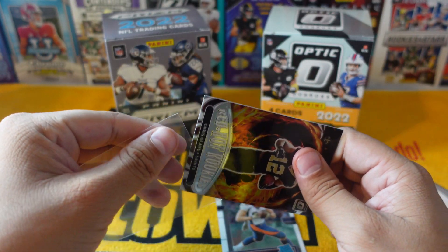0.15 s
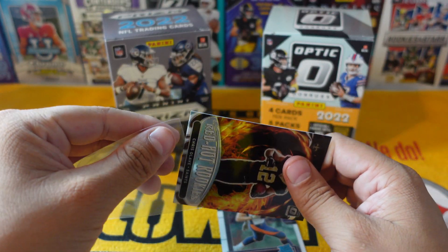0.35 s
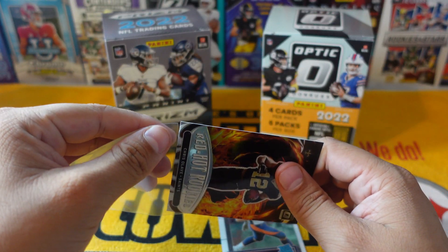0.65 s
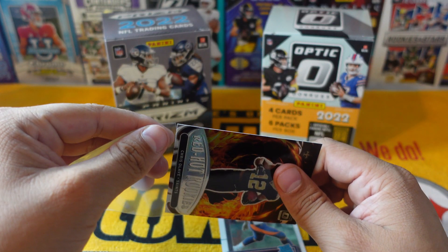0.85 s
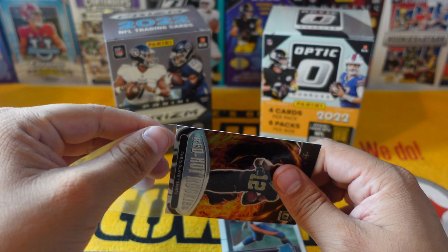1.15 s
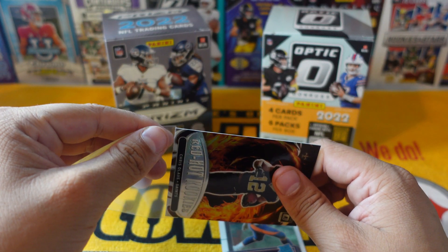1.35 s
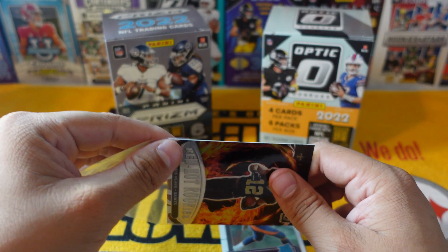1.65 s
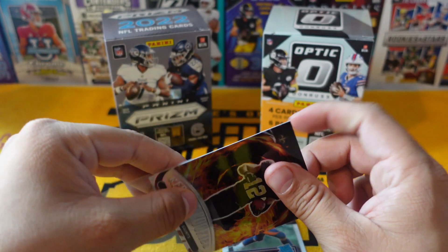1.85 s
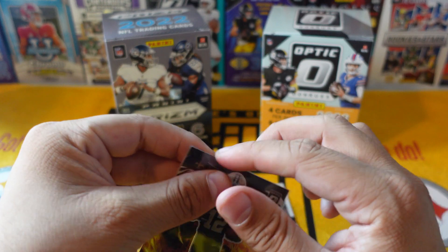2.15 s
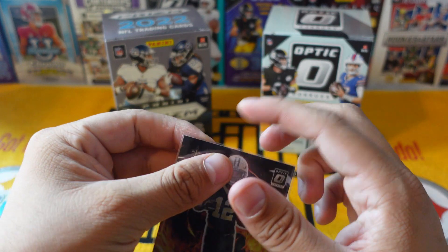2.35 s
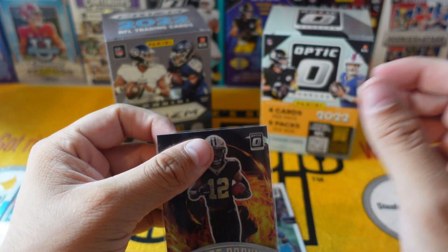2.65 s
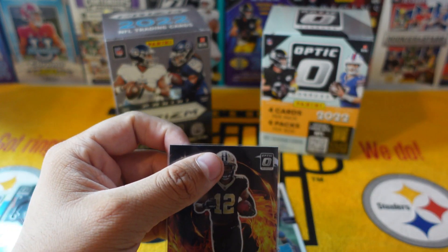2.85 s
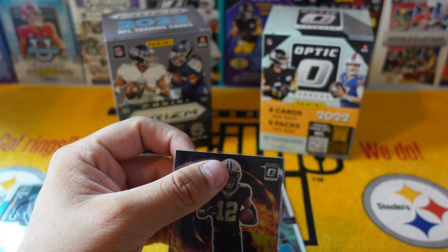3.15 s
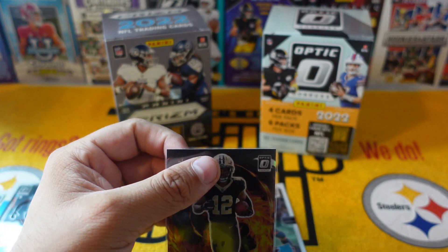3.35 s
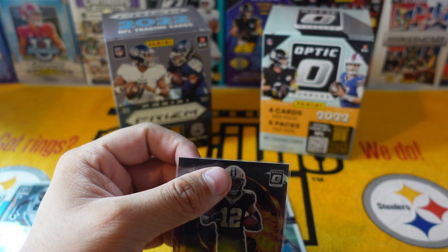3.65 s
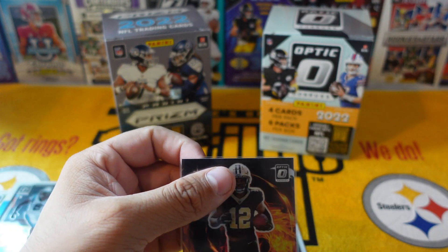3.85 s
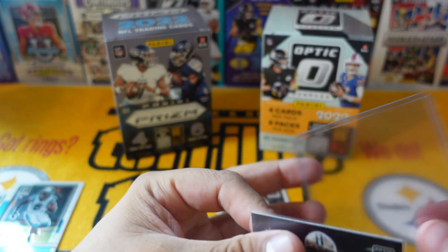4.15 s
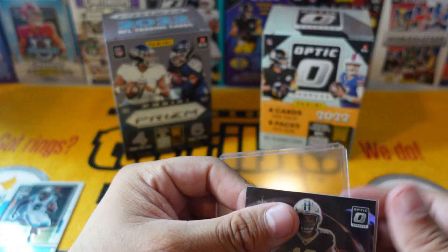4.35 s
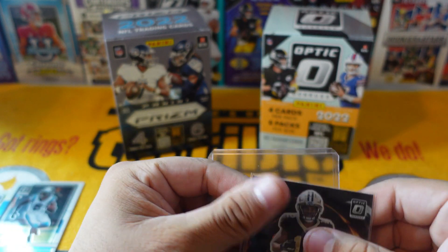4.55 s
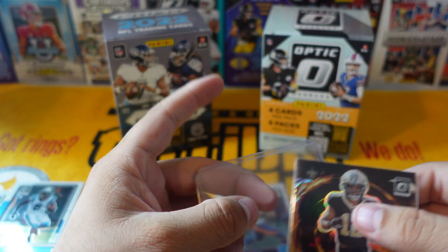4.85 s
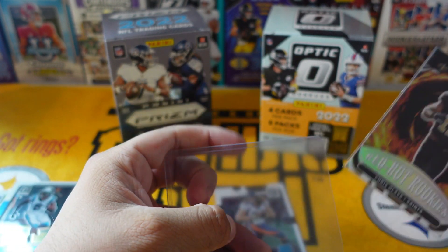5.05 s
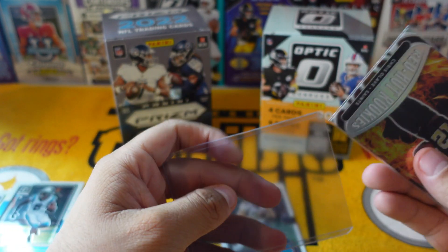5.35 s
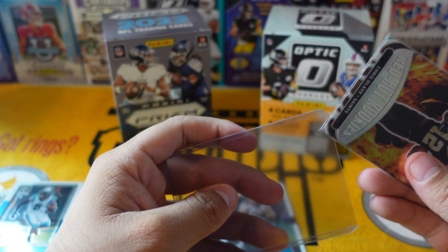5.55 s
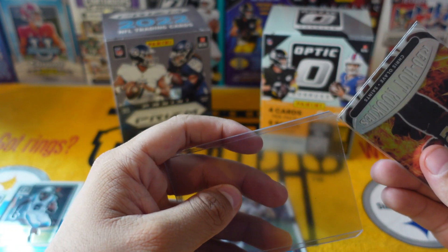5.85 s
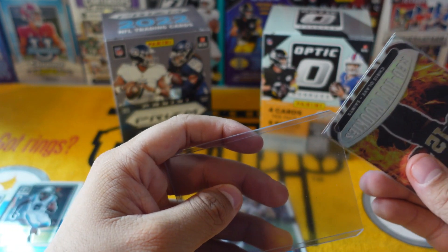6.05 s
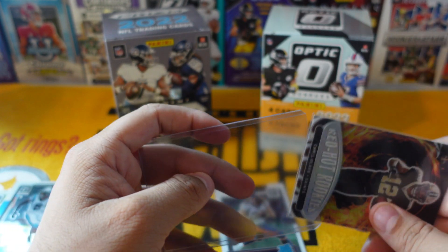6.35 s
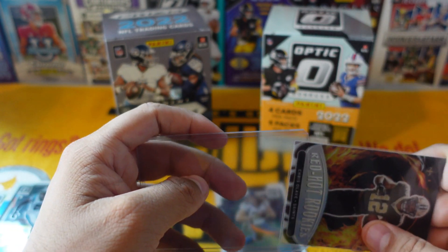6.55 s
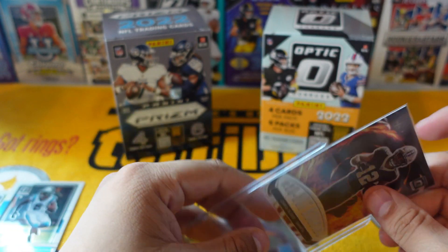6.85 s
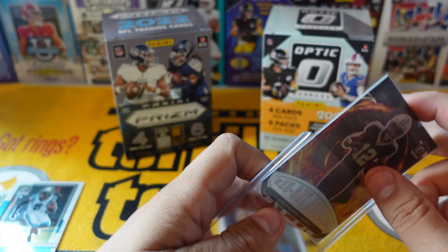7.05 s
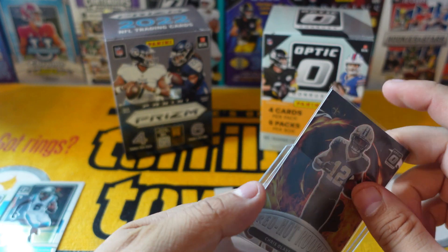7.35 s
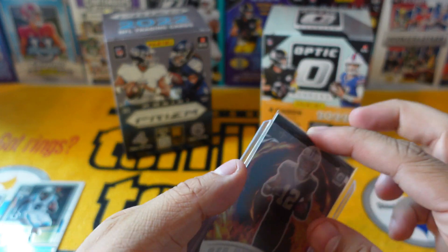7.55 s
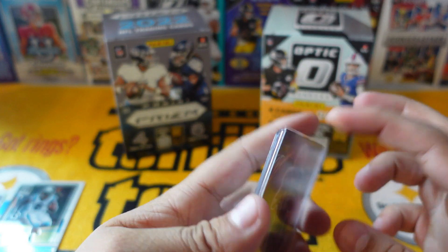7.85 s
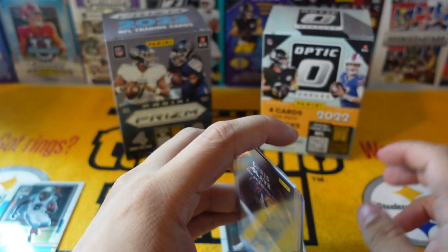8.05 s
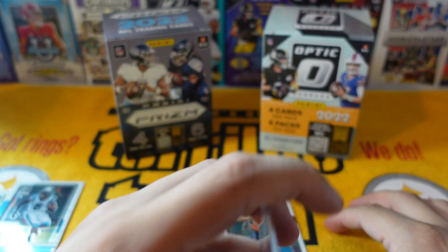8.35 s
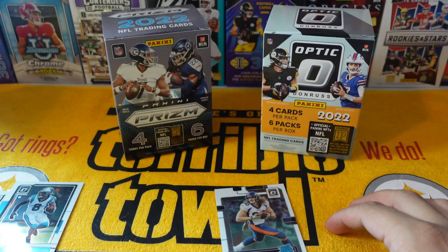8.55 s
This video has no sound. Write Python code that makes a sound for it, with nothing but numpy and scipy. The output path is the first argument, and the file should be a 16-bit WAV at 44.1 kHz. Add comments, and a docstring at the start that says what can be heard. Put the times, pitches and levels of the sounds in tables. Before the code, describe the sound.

A thin plastic sleeve ticks and rustles softly through the first second, close to the microphone in a small, lively room. From about 1.6 to 2.2 seconds a trading card slides in with a light hiss and an edge flicks off a fingertip. Fingers rub the card, and several dull knocks sound on the cloth-covered desk between 2.7 and 3.6 seconds. The sleeve squeaks very faintly around 4 seconds. From 4.2 to 6.4 seconds a rigid plastic holder clicks lightly, with a quick chatter at 5.3. The card scrapes into the holder in small shoves from 6.6 to 7.2 seconds, followed by a sharp flick at 7.4 and more soft rubbing. At 8.5 seconds comes the loudest sound, a hollow knock that briefly rings the desk. An appliance hums over its fan throughout, and arm movements add a faint low rumble.

```python
"""A small, lively room, one microphone on a stand close to a cloth-covered desk.
A trading card is eased into a soft sleeve, then shoved into a rigid plastic holder. The thin film ticks,
rubs and squeaks; the holder's stiff walls click and chatter. Knocks ring the desk and thump up the stand,
which also sways as the arms move. Behind it all, an appliance hums over the rush of its fan."""
import sys
import numpy as np
from scipy import signal
from scipy.fft import rfft, irfft, next_fast_len
from scipy.io import wavfile
from scipy.ndimage import map_coordinates

SR = 44100
rng = np.random.default_rng(int(sys.argv[2]) if len(sys.argv) > 2 else 0)


def bounce(signal):
    """Save signal as a 16-bit WAV file at the path given by the first command-line argument."""
    frames = np.transpose(np.atleast_2d(signal))
    limited = np.clip(frames, -1, 1)
    pcm = np.round(limited * 32767).astype(np.int16)
    wavfile.write(sys.argv[1], SR, pcm)


N = 383650

# Levels are relative within each table.
# card and soft sleeve ticking: start_s, level_db, body_db, air_db
SLEEVE_TICKS = [(0.0494, -41, -15, -22.5), (0.0915, -31.5, -11.5, -24.5), (0.1158, -33, -4, -15.5),
                (0.3214, -41, -16.5, -23.5), (0.4496, -36, -18.5, -18.5), (0.4575, -34, -3, -18),
                (0.636, -46, -16.5, -30), (0.6539, -44.5, 7, -13.5), (0.784, -48, 1.5, -37),
                (1.3254, -47, -2.5, -22.5), (1.691, -36, -16.5, -32), (1.8334, -40.5, -2.5, -20),
                (2.3337, -43, -13.5, -9), (3.0789, -31.5, -11, -21.5), (3.5713, -38.5, -11.5, -23),
                (3.7555, -38.5, -20, -24), (7.302, -43, -42.5, -23), (7.86, -41.5, -20, -23.5)]
# an edge flicking off a fingertip: start_s, level_db, centre_hz, width_hz, air_db
EDGE_FLICKS = [(2.171, -32.5, 8570, 2400, 12.5), (7.4235, -26, 6590, 3400, 3)]
# tone of thin plastic: frequency_hz, level_db
PLASTIC_TONE = [(200, -6), (1000, -8), (2500, -4.5), (5000, -0.5), (8500, -5), (11000, -14), (15500, -19.5)]
# the stiff holder clicking: start_s, level_db, resonance_hz, ring_db
HOLDER_CLICKS = [(4.2518, -50.5, 4710, 6.5), (4.3267, -45.5, 2206, 12.5), (4.3682, -41, 2324, 14),
                 (4.5354, -45.5, 4420, 7), (4.552, -45.5, 3220, 11), (4.619, -45, 5210, 7.5),
                 (4.7117, -39.5, 3566, 14), (4.728, -49.5, 3550, 15.5), (4.8759, -51.5, 3680, -13.5),
                 (5.128, -39, 5090, 9), (5.132, -41, 3780, -6.5), (5.8672, -46, 4630, -18.5),
                 (6.035, -50, 5000, 3.5), (6.3463, -50, 4170, 0.5)]
# resonances of the holder's walls: pitch_hz, width_hz, level_db
HOLDER_MODES = [(2570, 550, -9), (7000, 350, -4), (8870, 445, -8), (11270, 235, -10.5), (13080, 3600, 5.5)]
# card entering the sleeve, then the holder: start_s, end_s, start_db, end_db, start_hz, end_hz
CARD_SLIDES = [(1.61, 2.193, -52, -58, 4470, 15500), (6.614, 7.203, -45.5, -62, 6500, 5900)]
# film slipping over plastic: peak_s, level_db, half_length_s
FILM_SLIPS = [(0.329, -58.5, 0.055), (0.906, -64, 0.0148), (2.32, -61.5, 0.0213), (3.31, -60, 0.11),
              (3.625, -50.5, 0.036), (3.767, -50, 0.0286), (4.006, -60.5, 0.091), (4.932, -61, 0.187),
              (6.157, -63, 0.161), (6.378, -59, 0.047), (7.599, -56, 0.032), (7.804, -56, 0.0356),
              (7.931, -53.5, 0.0337), (8.225, -56, 0.0734), (8.305, -47.5, 0.0327)]
# fingers rubbing the card: peak_s, level_db, half_length_s
FINGER_RUBS = [(0.13, -56.5, 0.059), (2.682, -49.5, 0.0533), (2.754, -46, 0.045), (2.889, -60, 0.081),
               (3.401, -34, 0.0266), (4.347, -52.5, 0.053), (7.345, -45.5, 0.037), (8.239, -51, 0.0394),
               (8.303, -43.5, 0.0137)]
# the sleeve squeaking: start_s, length_s, middle_pitch_hz, glide_hz_per_s, level_db
SLEEVE_SQUEAKS = [(3.945, 0.082, 9230, -9000, -73.5), (4.066, 0.075, 9480, -9000, -69.5),
                  (7.18, 0.21, 9200, 2001, -72)]
# blows on the desk: start_s, level_db, hollow_hz, dull_above_hz, thump_db
DESK_KNOCKS = [(2.742, -35.5, 262, 1100, -16.5), (3.0884, -25.5, 659, 1040, -3), (3.101, -28, 962, 1090, 2),
               (3.396, -29.5, 250, 7500, -16.5), (3.403, -26, 675, 6000, -14.5),
               (3.599, -39.5, 1040, 5500, 4.5), (4.27, -41.5, 650, 1500, 8.5),
               (8.311, -44.5, 300, 1500, 15.5), (8.519, -10.5, 480, 780, -8.5),
               (8.536, -8.5, 312, 885, -19)]
# resonances of the desk top: pitch_hz, level_db, t60_s
DESK_MODES = [(222.4, 1, 0.26), (249.9, 2, 0.192), (317, 6, 0.137), (368, 1, 0.081), (499.5, -7, 0.13),
              (686.3, -2, 0.16), (736.6, -4, 0.198), (1540, -2.5, 0.049)]
# tone of a hard contact: frequency_hz, level_db
CLATTER_TONE = [(100, -54.5), (220, 9), (400, 6), (700, 3.5), (1200, 3), (2000, 1.5), (3000, 1), (8000, 0),
                (15000, -13)]
# how hard the arms move: time_s, effort_db
ARM_EFFORT = [(0.3, -28), (0.85, -36), (1.55, -34), (1.95, -21.5), (2.3, -25.5), (2.6, -29.5),
              (2.95, -28.5), (3.3, -27), (3.85, -32), (4.55, -17.5), (5.28, -24), (5.6, -35), (6.05, -44),
              (6.35, -24), (6.6, -35.5), (7.1, -16.5), (7.7, -28.5), (8.6, -20.5)]
# partials of the appliance's motor: pitch_hz, level_db
MOTOR_HUM = [(119.7, -47), (162, -64.5), (239.5, -65), (359.6, -58.5)]
# rush of its fan: frequency_hz, level_db
FAN_TONE = [(20, 12), (90, 4), (125, 8.5), (170, 0.5), (260, -2), (420, -11), (800, -11), (1500, -12.5),
            (2000, -18.5), (2800, -30.5), (8000, -32.5), (15500, -37)]
# decay of the room: frequency_hz, t60_s
ROOM_DECAY = [(100, 0.408), (400, 0.368), (2000, 0.461), (6000, 0.439), (10000, 0.421), (15000, 0.0822)]
# echoes off near surfaces: delay_s, level_db
EARLY_ECHOES = [(.0063, -13), (0.0189, -19), (.019, -11)]
# tones of sliding friction, the stand's thump and shake, and desk rumble: frequency_hz, level_db
FRICTION_TONE = [(150, 37), (2000, 9), (8500, 4), (10500, 0), (15500, 0.5)]
THUMP_TONE = [(20, 3), (45, 3), (100, 4.5), (170, -21), (500, -52), (4000, -100)]
SHAKE_TONE = [(5, 26), (13, 16.5), (25, -5), (45, -12.5), (90, -53.5)]
RUMBLE_TONE = [(20, -4), (50, -5), (90, -4), (125, -9.5), (170, -20), (300, -36), (700, -44), (2000, -106)]

FILM_HZ, SKIN_HZ, GRIP_HZ = 5780, 2093, 1190  # broad resonance of each kind of friction


def sleeve_ticks(crease_t60_s=0.03293, flick_t60_s=0.0083):
    """Soft creases tick without ringing, each with its own body and air; edges flick off a fingertip."""
    out = np.zeros(N)
    for start, db, body_db, air_db in SLEEVE_TICKS:
        tilt = [(2000, body_db + 16), (5500, 0), (12000, air_db + 24)]
        colour = lambda f: tone(PLASTIC_TONE, f) * tone(tilt, f)
        add(out, start, amp(db - 1.5) * contact(colour, crease_t60_s))
    for start, db, hz, width, air_db in EDGE_FLICKS:
        tilt = [(2500, -2), (4300, -7.5), (6000, -6), (9000, 2), (12000, air_db + 0.5)]
        edge = lambda f: 0.236 + abs(resonance(f, hz, width)) ** 2
        colour = lambda f: edge(f) * tone(PLASTIC_TONE, f) * tone(tilt, f)
        add(out, start, amp(db + 12.5) * contact(colour, flick_t60_s))
    return out


def holder_clicks(t60_s=0.0243, grip_detune=0.019):
    """Clicks ring the holder's walls; the grip detunes them and sets which resonance leads."""
    out = np.zeros(N)
    for start, db, hz, ring_db in HOLDER_CLICKS + finger_chatter():
        shifts = 1 + grip_detune * rng.standard_normal(len(HOLDER_MODES))
        walls = lambda f: sum(amp(mode_db) * resonance(f, mode_hz * shift, width)
                              for (mode_hz, width, mode_db), shift in zip(HOLDER_MODES, shifts))
        ring = lambda f: 1 + amp(ring_db) * resonance(f, hz, width_hz=191) + walls(f)
        add(out, start, amp(db + 7.5) * contact(lambda f: tone(PLASTIC_TONE, f) * ring(f), t60_s))
    return out


def finger_chatter(start_s=5.3114, count=7, gap_s=0.0092, first_db=-38, loss_db=1.3, hz=5320, ring_db=7.5):
    """A fingertip judders over the holder in nearly even, weakening slips: rows like HOLDER_CLICKS."""
    clicks = []
    for k, (late, sharp) in enumerate(rng.uniform(-1, 1, (count, 2))):
        slip_s = start_s + gap_s * (k + 0.15 * late * (k > 0))
        clicks.append((slip_s, first_db - loss_db * k, hz * (1 + 0.067 * sharp), ring_db))
    return clicks


def card_slides(seating_s=0.148, shove_hz=8, shove_db=2, attack_s=0.05, release_s=0.015):
    """The card's edge scrapes as it enters, then glides in shoves; the colour shifts as it goes deeper."""
    out = np.zeros(N)
    for start, end, start_db, end_db, start_hz, end_hz in CARD_SLIDES:
        t = np.arange(int((end - start) * SR)) / SR
        remaining = t[-1] - t
        scrape_db = (start_db - end_db) * np.exp(-(t / seating_s) ** 2 / 2)
        db = end_db + scrape_db - shove_db * np.cos(2 * np.pi * shove_hz * remaining)
        fade = np.minimum(t / attack_s, 1) ** 2 * np.minimum(remaining / release_s, 1)
        blend = np.pi / 2 * t / t[-1]
        hiss = np.cos(blend) * friction(start_hz, len(t)) + np.sin(blend) * friction(end_hz, len(t))
        add(out, start, amp(db - 7) * fade * hiss)
    return out


def rubbing():
    """Bright film and dull skin strokes swell and fade; with grip and slides, they catch on tiny bumps."""
    out = grip_rustle() + card_slides()
    t = np.arange(SR // 2) / SR - 0.25
    for strokes, hz in ((FILM_SLIPS, FILM_HZ), (FINGER_RUBS, SKIN_HZ)):
        for peak, db, half_length in strokes:
            swell = np.exp(-(t / half_length) ** 2)
            add(out, peak - 0.25, amp(db - 4.5) * swell * friction(hz, len(t)))
    bumps = amp(4 * wobble(500) + 1.6 * wobble(50))
    return out * unit(bumps)


def grip_rustle(skin_db=-44, film_db=-50.5):
    """The hands rustle faintly on the plastic as the arms move."""
    pressure = arm_effort() * amp(2 * wobble(12))
    return pressure * (amp(skin_db) * friction(GRIP_HZ) + amp(film_db) * friction(FILM_HZ))


def sleeve_squeaks(overtone_ratio=1.215, overtone_db=-5, sag_hz=200):
    """Stick and slip makes the film whistle at two gliding pitches that sag at both ends."""
    out, waver = np.zeros(N), 1 + 0.0025 * wobble(300)
    for start, length, middle_hz, glide, db in SLEEVE_SQUEAKS:
        position = np.linspace(-1, 1, int(length * SR))
        hz = middle_hz + glide * position * length / 2 - sag_hz * position ** 2
        phase = 2 * np.pi * np.cumsum(hz * waver[int(start * SR):][:len(hz)]) / SR
        whistle = np.sin(phase) + amp(overtone_db) * np.sin(overtone_ratio * phase)
        add(out, start, amp(db) * np.sqrt(1 - position ** 2) * whistle)
    return out


def desk_knocks(clatter_t60_s=0.05, thump_t60_s=0.22):
    """Each blow clatters, rings the desk top and sends a low thump up the microphone stand."""
    out, t = np.zeros(N), np.arange(SR // 2) / SR
    onset = (1 - np.exp(-t / 0.00027)) ** 2
    for start, db, hollow_hz, dull_hz, thump_db in DESK_KNOCKS:
        soft = lambda f: 1 / np.sqrt(1 + (f / dull_hz) ** 3.736)
        hollow = lambda f: 1 + 2 * resonance(f, hollow_hz, hollow_hz / 3)
        clatter = contact(lambda f: tone(CLATTER_TONE, f) * soft(f) * hollow(f), clatter_t60_s)
        modes = sum(amp(mode_db - 60 * t / t60) * np.sin(2 * np.pi * (hz * t + rng.random()))
                    for hz, mode_db, t60 in DESK_MODES)
        ring = amp(db - 12) * onset * unit(modes)  # only heavy blows move the top much
        thump = contact(lambda f: tone(THUMP_TONE, f), thump_t60_s, rise_s=0.00059)
        add(out, start, amp(db) * (amp(2.5) * clatter + ring + amp(thump_db) * thump))
    return out


def stand_sway(rocking_hz=12.5, sway_db=-2, rumble_db=-22.5):
    """Arm movements rock the microphone stand and rumble through the desk."""
    rocking = np.sin(2 * np.pi * np.cumsum(rocking_hz + 1.1006 * wobble(37)) / SR)
    sway = rocking + 0.357 * noise(lambda f: tone(SHAKE_TONE, f))
    rumble = noise(lambda f: tone(RUMBLE_TONE, f))
    jolts = amp(2.5 * wobble(12))
    return arm_effort() * (amp(sway_db) * sway + amp(rumble_db) * jolts * rumble)


def appliance(fan_db=-50):
    """In the background, a mains-driven motor hums over the rush of its fan."""
    hum, t = np.zeros(N), np.arange(N) / SR
    for hz, db in MOTOR_HUM:
        level = np.sqrt(2) * amp(db + 0.8 * wobble(4))
        hum += level * np.sin(2 * np.pi * hz * t + 0.054 * wobble(3))
    return hum + amp(fan_db) * noise(lambda f: tone(FAN_TONE, f))


def room(direct, tail_db, build_s=0.0064):
    """Near surfaces echo first, then a diffuse tail; both vary every third of a second."""
    out, block = direct.copy(), SR // 3
    for first in range(0, N, block):
        part, start = direct[first:first + block], first / SR
        for delay, db in EARLY_ECHOES:
            add(out, start + delay * (1 + rng.normal(0, 0.04)), amp(db) * part)
        hz, t, bands = signal.stft(rng.standard_normal(SR // 2), SR, nperseg=256)
        decay = amp(-60 * t / along(ROOM_DECAY, hz)[:, None])
        _, tail = signal.istft(bands * decay * (1 - np.exp(-t / build_s)), SR, nperseg=256)
        add(out, start, amp(tail_db) * signal.fftconvolve(part, tail / np.linalg.norm(tail)))
    return out


def contact(response, t60_s, rise_s=0.001139):
    """A burst of micro-slips that dies quickly, evenly spread in frequency and then coloured."""
    t = np.arange(SR // 2) / SR
    force = amp(-60 * t / t60_s) * (1 - np.exp(-t / rise_s))
    spectrum = rfft(force * rng.standard_normal(len(t)), SR)
    slips = irfft(spectrum / np.sqrt(abs(spectrum) + 1e-9), SR)[:len(t)]
    return unit(causal(slips, response)) * np.sqrt(np.mean(force ** 2))


def friction(hz, size=N):
    """The hiss of two surfaces sliding, with a broad resonance at hz."""
    return noise(lambda f: abs(resonance(f, hz, 1.316 * hz)) * tone(FRICTION_TONE, f), size)


def arm_effort():
    """How hard the arms move, as a gain for each sample."""
    times, db = np.transpose(ARM_EFFORT)
    return amp(np.interp(np.arange(N) / SR, times, db))


def amp(db):
    """Decibels to gain."""
    return 10 ** (np.asarray(db) / 20)


def unit(x):
    """Scale to rms 1."""
    return x / np.sqrt(np.mean(x ** 2) + 1e-20)


def along(points, hz):
    """Interpolate (frequency_hz, value) points on a log axis."""
    frequencies, values = np.transpose(points)
    return np.interp(np.log(hz + 1), np.log(frequencies + 1), values)


def tone(points, hz):
    """Gain at hz of a (frequency_hz, level_db) curve."""
    return amp(along(points, hz))


def wobble(rate):
    """A smooth random curve, rate knots a second."""
    knots = rng.standard_normal(int(N * rate / SR) + 4)
    return map_coordinates(knots, [np.arange(N) * rate / SR])


def resonance(f, hz, width_hz):
    """A causal resonance of peak gain 1."""
    return 1j * f * width_hz / (hz * hz - f * f + 1j * f * width_hz)


def filtered(x, response):
    """Colour x by a frequency response."""
    size = next_fast_len(len(x) + SR // 2)
    return irfft(rfft(x, size) * response(np.fft.rfftfreq(size, 1 / SR)), size)[:len(x)]


def causal(x, response):
    """Colour x so that nothing sounds before its cause (minimum phase)."""
    size = 2 * len(x)
    gain = abs(response(np.fft.rfftfreq(size, 1 / SR)))
    cepstrum = irfft(np.log(gain + 1e-6), size)
    cepstrum[1:len(x)] *= 2
    cepstrum[len(x):] = 0
    return irfft(rfft(x, size) * np.exp(rfft(cepstrum)), size)[:len(x)]


def noise(response, size=N):
    """Coloured noise of rms 1."""
    return unit(filtered(rng.standard_normal(size), response))


def add(track, start_s, sound):
    """Mix a sound in at start_s."""
    part = track[max(round(start_s * SR), 0):][:len(sound)]
    part += sound[:len(part)]


def scene():
    """The hands work in the open room; the knocks also travel straight up the stand, so they are drier."""
    hands = room(sleeve_ticks() + holder_clicks() + rubbing(), tail_db=-2.5)
    desk = room(desk_knocks(), tail_db=-4.5)
    return (hands + desk + sleeve_squeaks() + stand_sway() + appliance())[None]


def record(dry):
    """One microphone, into a recorder that keeps nothing above 15.8 kHz."""
    return filtered(dry[0], lambda f: f < 15800)[None]


dry = scene()
out = record(dry)
bounce(out)
```